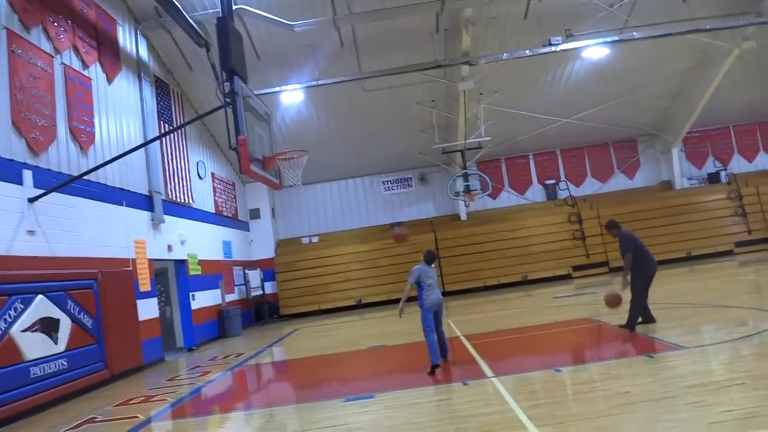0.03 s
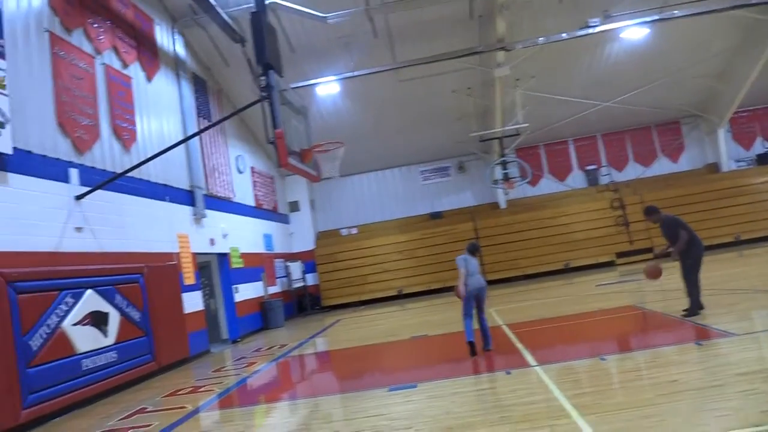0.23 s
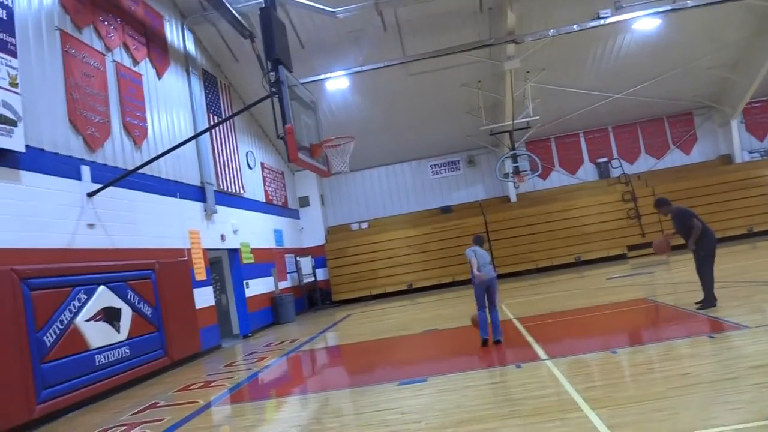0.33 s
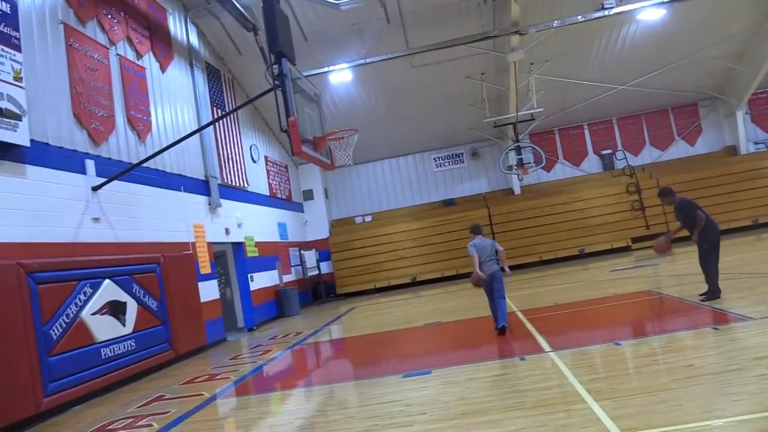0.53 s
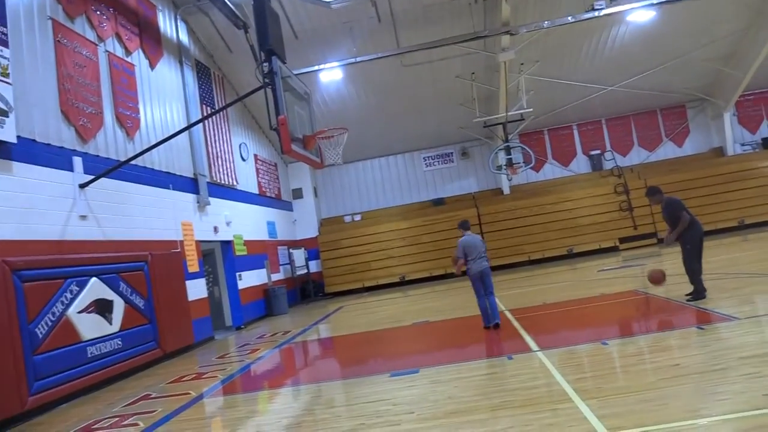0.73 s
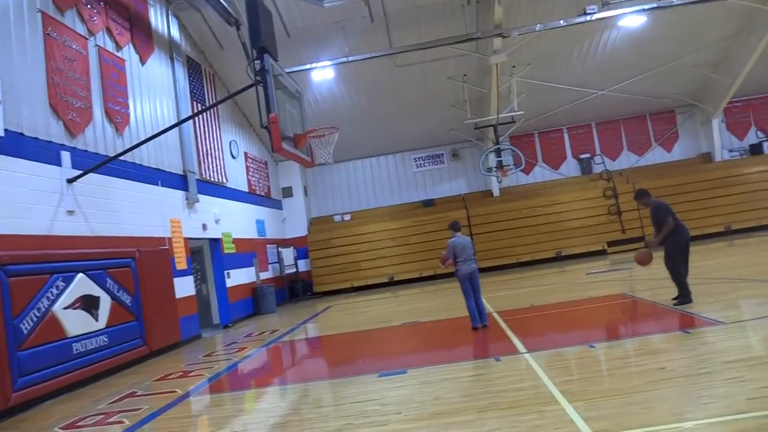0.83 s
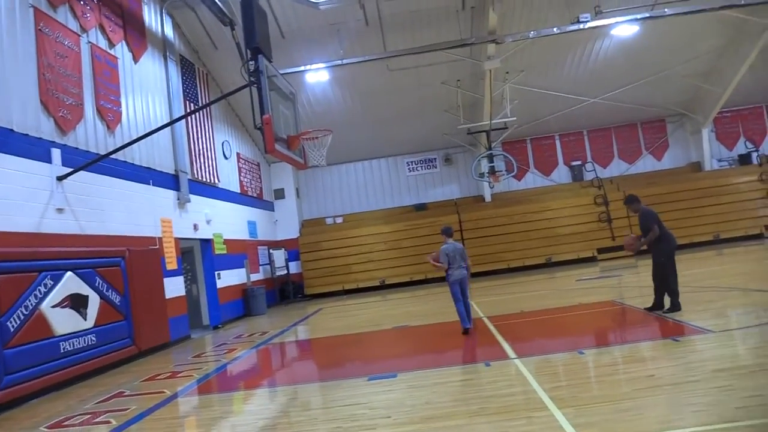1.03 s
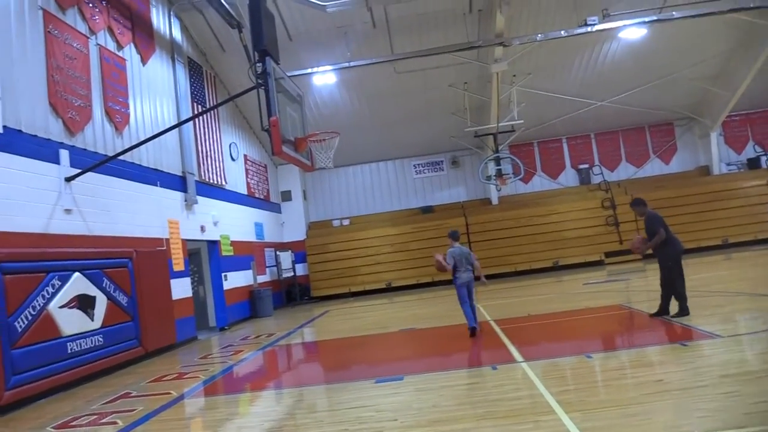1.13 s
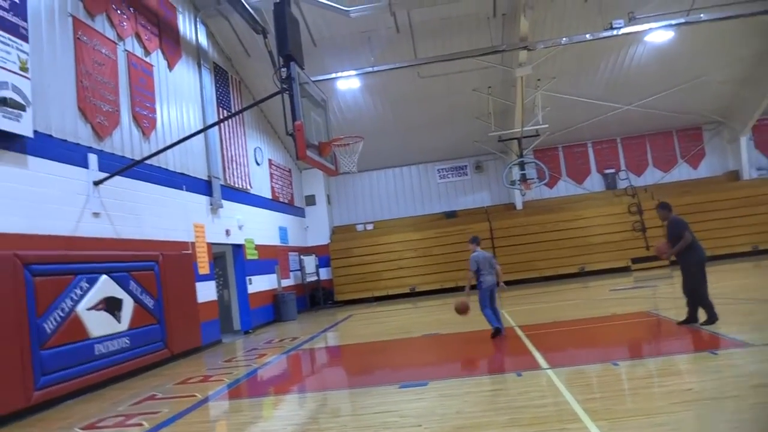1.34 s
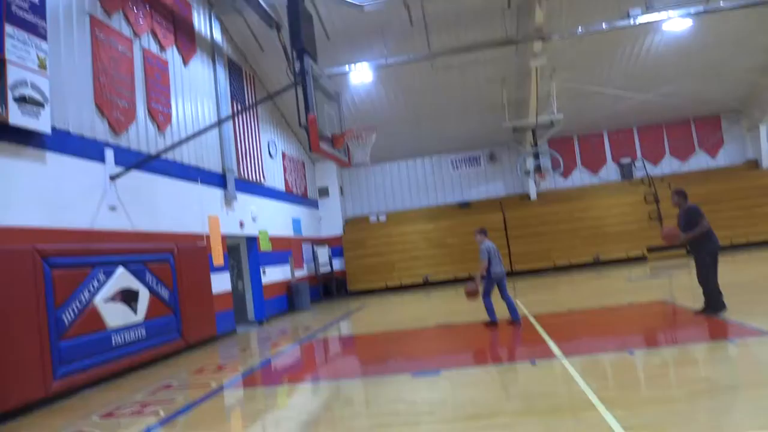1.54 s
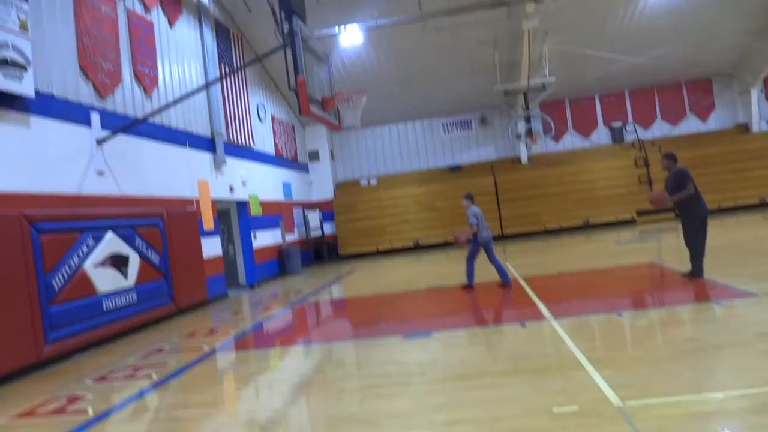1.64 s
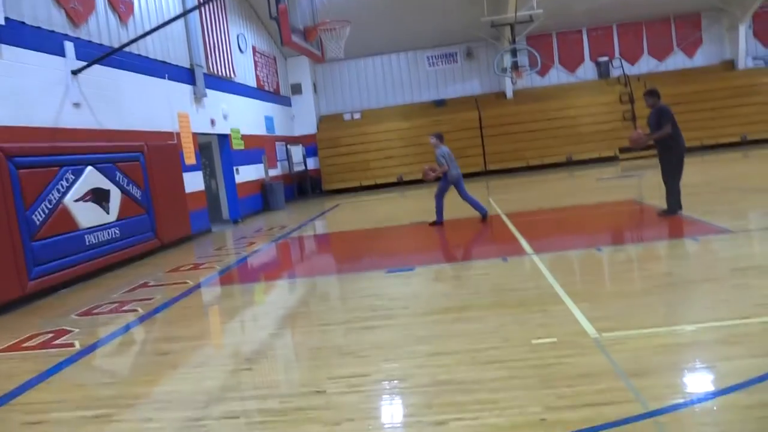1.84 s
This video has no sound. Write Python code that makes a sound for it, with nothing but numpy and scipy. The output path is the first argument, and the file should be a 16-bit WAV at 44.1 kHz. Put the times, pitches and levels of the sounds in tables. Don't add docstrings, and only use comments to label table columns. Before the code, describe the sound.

Hard basketball bounces slap and thump on a sprung wooden floor in a large echoing gymnasium.

```python
import sys
import numpy as np
from scipy import signal
from scipy.fft import rfft, irfft
from scipy.io import wavfile
from scipy.ndimage import uniform_filter1d

SR = 44100
rng = np.random.default_rng(int(sys.argv[2]) if len(sys.argv) > 2 else 0)


def pcm_store(signal):
    levels = np.round(np.clip(np.atleast_2d(signal), -1, 1) * 32767)
    wavfile.write(sys.argv[1], SR, levels.astype(np.int16).T)


N = 83790

# (frequency [Hz], level [dB per Hz])
HALL_COLOUR = [(24, -43), (40, 11), (92, 1), (406, -11), (578, -21), (1030, -12), (3640, -20), (14500, -64),
               (16500, -77)]


def balls():
    # (time [s], slap [dB], ping [dB], thump [dB], hall [dB])
    bounces = [
        (0.206, -1, -10, -7, -1),
        (0.4791, -3, -10, -4.5, -1),
        (0.7846, 1, -9.5, -8, -0.5),
        (1.53, 1, -7.5, -9.5, 0.5),
    ]
    # (near wall lag [s], wall click pitch [Hz], thump lag [s], thump pitch [Hz], thump rise [s])
    spots = [(.0139, 1500, .0012, 107, .001), (.0148, 2400, .0014, 105, .003),
             (.0137, 2000, .0013, 105, .001), (.0133, 3900, .0062, 98, .001)]
    # (slap pitch [Hz], rebound lag [s], rebound level [dB], slap t60 [s], ping t60 scale)
    contacts = [(2700, .0008, -9, .0006, 1.4), (2100, .0007, -14, .001, 1.1), (2300, .0008, -2, .0013, .7),
                (2200, .0012, -12, .0022, .8)]
    # (near wall scatter [dB], hall brightness at the top [dB], hall bass [dB])
    answers = [(-12, 10, -1), (-2.5, 6.5, -3), (-11.5, 5, -3.5), (-12, -1.5, -4.5)]
    overtones_db = [-1.1, -2.6, -1.1, 1.4]
    clicks_db = [-17, -4, -22, -7]
    swings = [1, 1, 1, -1]
    # (frequency [Hz], level [dB per Hz])
    earlier_colour = [(24, -40), (40, -6), (141, 1.5), (245, -39), (349, -1.5), (707, -28), (3640, -19),
                      (9010, -26), (16500, -54)]

    out = np.zeros(N)
    add(out, -0.18, hall(-10.5, earlier_colour))
    for bounce, spot, contact, answer, boards_db, click_db, swing in zip(
            bounces, spots, contacts, answers, overtones_db, clicks_db, swings):
        s, slap_db, ping_db, thump_db, hall_db = bounce
        wall_s, wall_hz, thump_lag, thump_hz, thump_rise = spot
        slap_hz, back_s, back_db, slap_t60, ping_scale = contact
        scatter_db, bright_db, bass_db = answer

        slap = amp(slap_db) * skin_slap(slap_hz, back_s, back_db, slap_t60)
        ball = slap - amp(ping_db) * air_ping(back_s / 2, ping_scale)
        thump = swing * amp(thump_db) * floor_thump(thump_hz, boards_db, thump_lag, thump_rise)
        add(out, s, ball + thump)

        click = coloured(blow(wall_hz, 0, slap_t60), [(5000, 2), (12000, -4)])
        add(out, s + wall_s, -amp(click_db) * click)
        add(out, s + wall_s, amp(scatter_db) * smeared(ball, 0.006))
        add_echoes(out, s, ball, thump)

        tilt = [(120, bass_db), (300, 0), (4500, 0.014), (10000, bright_db)]
        add(out, s, coloured(hall(hall_db, HALL_COLOUR), tilt))
    return out


def skin_slap(hz, back_s, back_db, t60):
    # (frequency [Hz], level [dB])
    skin_colour = [(500, -18), (1500, 0), (3700, -3), (5500, -5.5), (16000, -28.5)]
    t = quarter_second()
    noise = unit(coloured(rng.standard_normal(len(t)), skin_colour))
    skin = amp(-23.5 - 60 * t / 0.019) * noise
    return skin - blow(hz, 0, t60) - amp(back_db) * blow(hz, back_s, t60)


def blow(hz, lag_s, t60):
    return ring([(hz, 1.5 + 15 / (hz * t60), t60)], lag=lag_s, rise=0.00002)


def air_ping(lag_s, scale):
    # (frequency [Hz], level [dB], t60 [s])
    air_tones = [(1035, 1, .022), (1750, -3, .011), (2450, -7, .009), (3600, -12, .006)]
    tones = [(hz, db, t60 * scale) for hz, db, t60 in air_tones]
    return ring(tones, lag=lag_s, rise=0.0012)


def floor_thump(hz, boards_db, lag_s, rise_s):
    # (frequency [Hz], level [dB], t60 [s])
    board_tones = [(201, -9.5, 0.058), (256.5, -10.5, 0.0307), (385.4, -10.5, 0.044), (767, -15, 0.03)]
    overtones = [(board_hz, db + boards_db, t60) for board_hz, db, t60 in board_tones]
    return ring([(hz, 4, 0.048)] + overtones, lag=lag_s, rise=rise_s)


def add_echoes(track, s, ball, thump):
    echo_lags = [.020, .025, .0325, .041, .068, .088, .125]
    # (slap and ping [dB], thump [dB])
    echo_levels = [(-22.5, -7), (-30, -5), (-20, -13.5), (-35, -19), (-17, -18.5), (-16, -14), (-22, -21)]
    for lag_s, (ball_db, thump_db) in zip(echo_lags, echo_levels):
        add(track, s + lag_s, amp(ball_db) * smeared(ball, 0.018))
        add(track, s + lag_s, -amp(thump_db) * thump)


def smeared(x, t60):
    # (frequency [Hz], level [dB])
    wall_colour = [(1000, -0.5), (4500, -2.5), (6000, -2.5), (16000, 4)]
    t = np.arange(SR // 50) / SR
    smear = rng.standard_normal(len(t)) * amp(-60 * t / t60)
    return coloured(signal.fftconvolve(x, smear / np.linalg.norm(smear)), wall_colour)


def hall(db, colour):
    # (frequency [Hz], t60 [s])
    hall_decay = [(60, 1.7), (250, 0.49), (700, 1.19), (2000, 1.124), (4000, 0.97), (8000, 0.89),
                  (15000, 0.84)]
    lag_s, rise_s = 0.002, 0.0055
    hz, t, z = signal.stft(rng.standard_normal(2 * SR), SR, nperseg=512)
    fall_db = 60 * t / along(hall_decay, hz)[:, None]
    z = z * amp(along(colour, hz)[:, None] - fall_db)
    tail = signal.istft(z, SR, nperseg=512)[1]
    tail = tail / np.std(tail[:SR // 10])
    t = np.maximum(np.arange(len(tail)) / SR - lag_s, 0)
    return amp(db - 25.5) * tail * (1 - np.exp(-t / rise_s))


def players():
    return steps() + catch() + hand_ticks()


def steps():
    # (time [s], level [dB], frequency [Hz], t60 [s])
    footsteps = [
        (.021, -26.5, 108, 0.035),
        (0.05, -31, 139, 0.036),
        (0.164, -24, 132, 0.048),
        (1.445, -43.5, 101, 0.13),
    ]
    out = np.zeros(N)
    for s, db, hz, t60 in footsteps:
        add(out, s, amp(db + 8.5) * ring([(hz, 0, t60)], rise=0.0072))
    return out


def catch():
    # (frequency [Hz], level [dB], t60 [s])
    catch_tones = [(340, -15.5, 0.046), (690, -25, 0.035), (1005, -24, 0.075)]
    out, catch_s = np.zeros(N), 0.677
    add(out, catch_s, amp(3) * ring(catch_tones, rise=0.0025))
    add(out, catch_s, hall(-9.5, HALL_COLOUR))
    return out


def hand_ticks():
    # (time [s], level [dB], t60 [s])
    puffs = [(0.179, -60, 0.076), (.678, -59.5, 0.088), (1.09, -61, 0.017), (1.7485, -53, .02),
             (1.81, -50, 0.012), (1.8214, -46, 0.013), (1.836, -52.5, 0.019)]
    # (frequency [Hz], level [dB])
    scuff_colour = [(1500, -40), (2200, 8), (3500, 3), (5000, -7), (8000, -13), (16000, -25)]
    out, t = np.zeros(N), quarter_second()
    for s, db, t60 in puffs:
        shape = amp(db - 60 * t / t60) * (1 - np.exp(-t / 0.005))
        add(out, s, shape * rng.standard_normal(len(t)))
    return amp(34) * coloured(out, scuff_colour)


def air():
    # (frequency [Hz], level [dB per Hz])
    air_colour = [(25, -25), (70, -19.5), (400, -11), (700, -17), (1100, -19.5), (3900, -24), (6000, -34),
                  (16500, -57)]
    z = signal.stft(rng.standard_normal(N + 512), nperseg=512)[2]
    patches = uniform_filter1d(rng.standard_normal(z.shape), size=5, axis=0)
    patches = uniform_filter1d(patches, size=10, axis=1)
    rush = signal.istft(z * amp(0.7 * unit(patches)), nperseg=512)[1][:N]
    return amp(-46) * gain() * unit(coloured(rush, air_colour))


def gain():
    # (time [s], level [dB])
    gain_curve = [(0, -0.5), (.2, 2.5), (.22, -1.5), (.47, 6.5), (.5, 6), (.8, 4), (1.5, -1), (1.55, -3.5),
                  (1.9, 1.5)]
    s, db = np.transpose(gain_curve)
    return amp(np.interp(np.arange(N) / SR, s, db))


def ring(modes, lag=0, rise=0):
    t = np.maximum(quarter_second() - lag, 0)
    tone = sum(amp(db - 60 * t / t60) * np.sin(2 * np.pi * hz * t) for hz, db, t60 in modes)
    return tone * (1 - np.exp(-t / (rise + 1e-5)))


def quarter_second():
    return np.arange(SR // 4) / SR


def add(track, s, x):
    i = round(s * SR)
    start = max(i, 0)
    x = x[max(-i, 0):][:len(track) - start]
    track[start:][:len(x)] += x


def coloured(x, points):
    m = 8192
    log_gain = np.log(amp(along(points, np.fft.rfftfreq(m, 1 / SR))))
    fold = np.r_[1, 2 * np.ones(m // 2 - 1), 1, np.zeros(m // 2 - 1)]
    response = irfft(np.exp(rfft(irfft(log_gain, m) * fold)), m)
    return signal.fftconvolve(x, response)[:len(x)]


def along(points, hz):
    f, v = np.transpose(points)
    return np.interp(np.log(hz + 1), np.log(f + 1), v)


def unit(x):
    return x / np.sqrt(np.mean(x ** 2) + 1e-20)


def amp(db):
    return 10 ** (np.asarray(db) / 20)


def scene():
    return np.array([1, 0])[:, None] * (balls() + players() + air())


def record(dry):
    # (frequency [Hz], level [dB])
    mic_colour = [(20, -24), (45, -8.5), (75, 2), (150, 2.5), (3000, -1), (3800, 2), (5000, -3.5),
                  (16000, 3.5)]
    band_limits = [
        [16680],
        [15200],
    ]
    left = coloured(dry[0], mic_colour)
    left = left / (1 + np.abs(left / 0.99) ** 8) ** (1 / 8)
    leak = coloured(left, [(150, -57), (600, -82)])
    right = amp(-77) * gain() * rng.standard_normal(N) + leak
    both = rfft([left, right]) * (np.fft.rfftfreq(N, 1 / SR) < np.array(band_limits))
    return irfft(both, N)


dry = scene()
out = record(dry)
pcm_store(out)
```